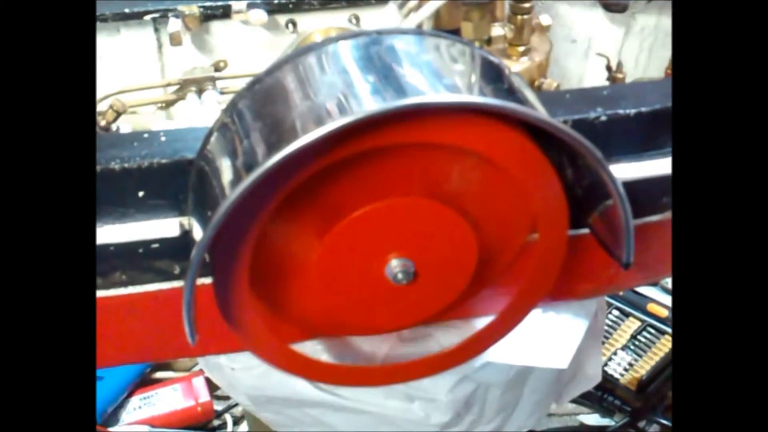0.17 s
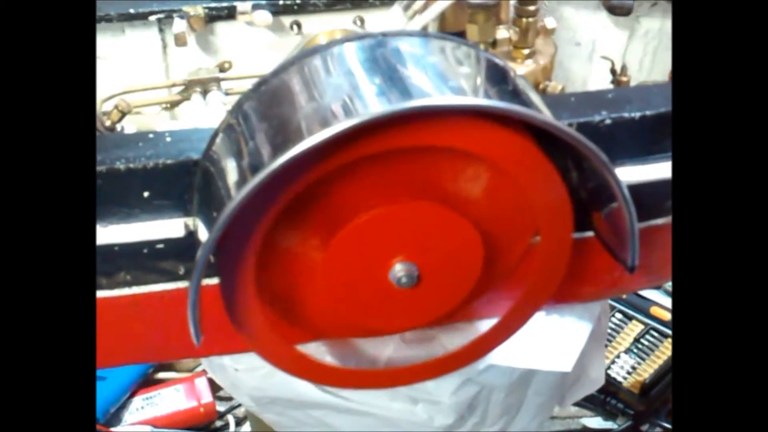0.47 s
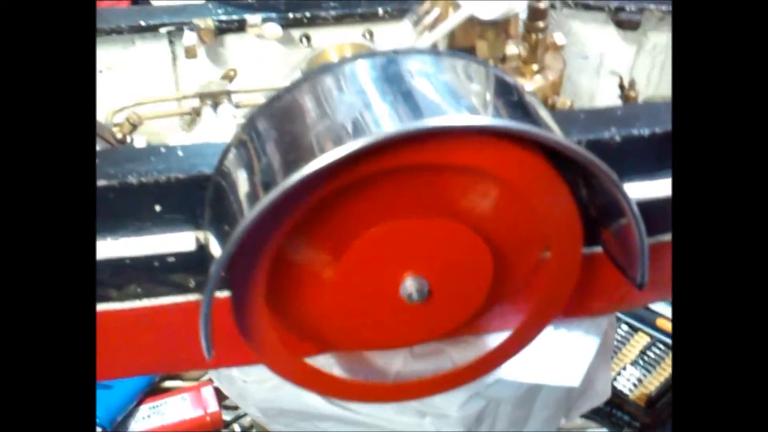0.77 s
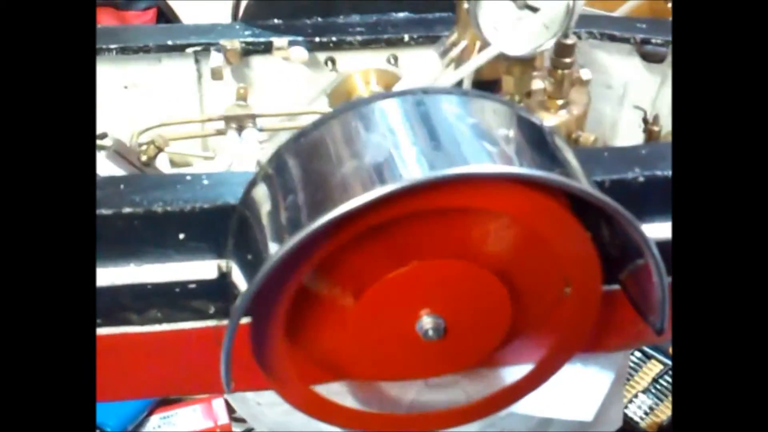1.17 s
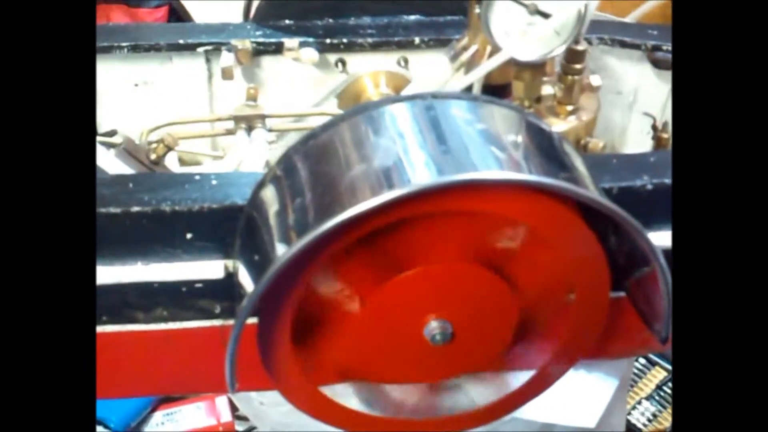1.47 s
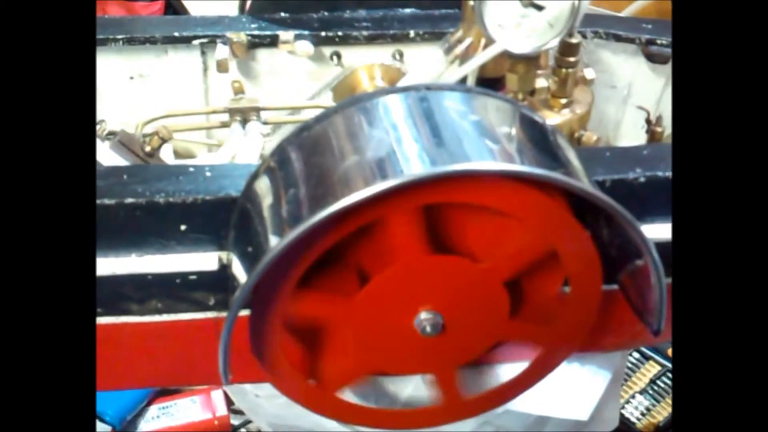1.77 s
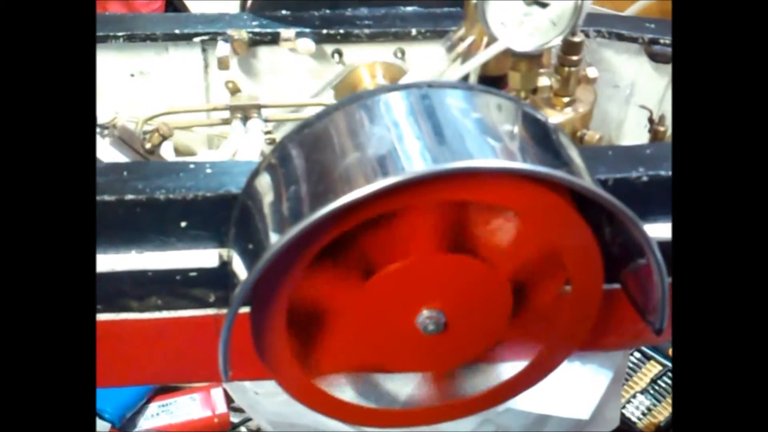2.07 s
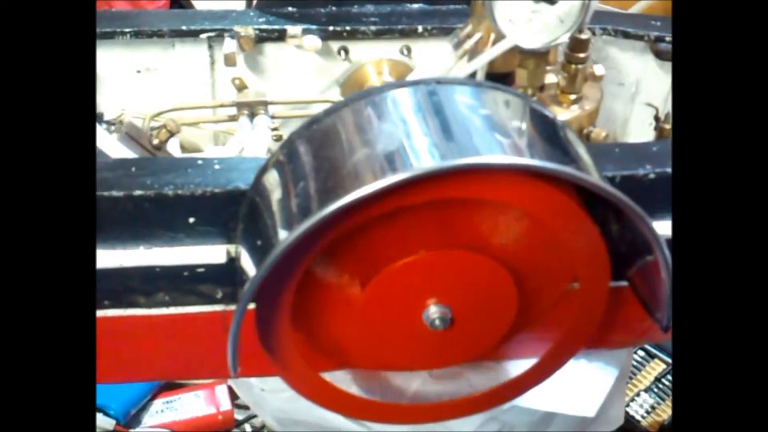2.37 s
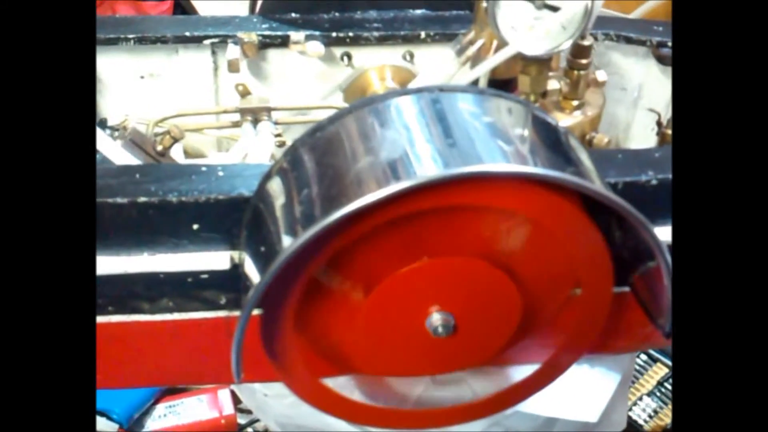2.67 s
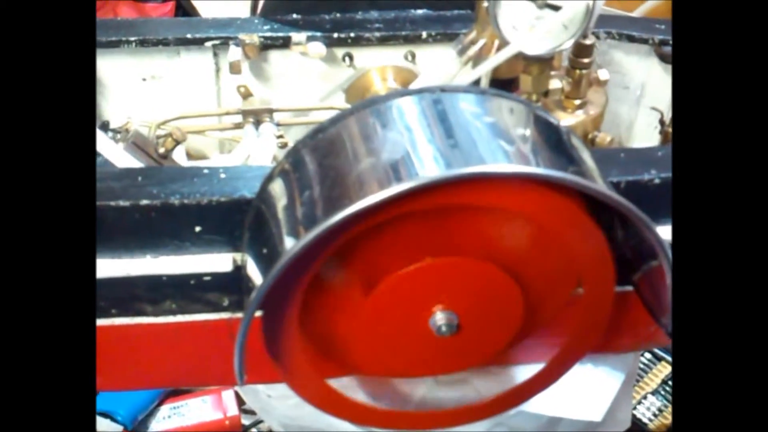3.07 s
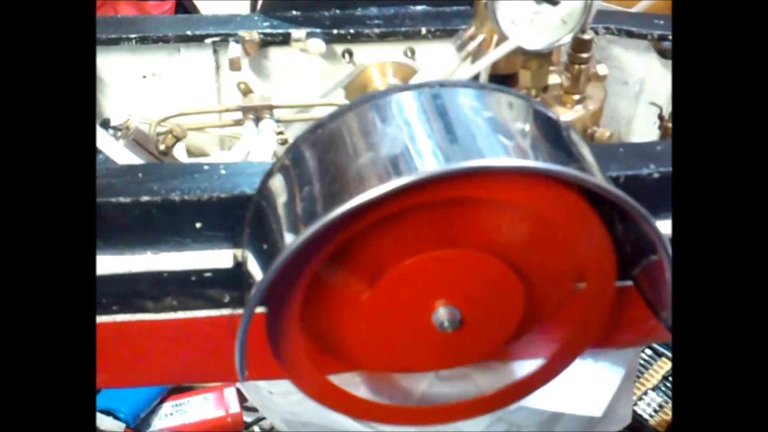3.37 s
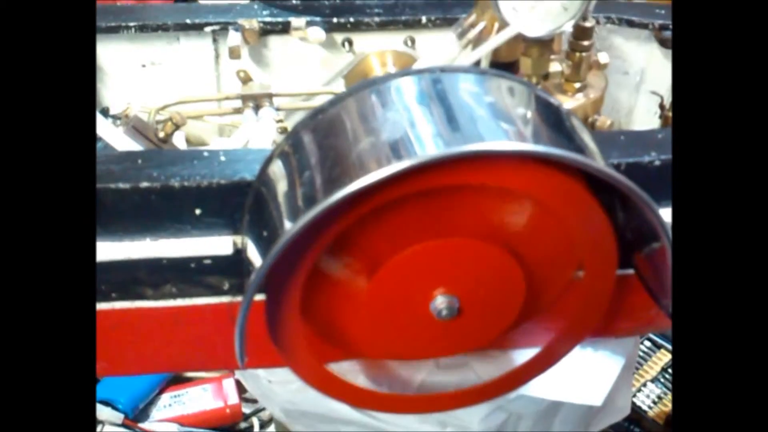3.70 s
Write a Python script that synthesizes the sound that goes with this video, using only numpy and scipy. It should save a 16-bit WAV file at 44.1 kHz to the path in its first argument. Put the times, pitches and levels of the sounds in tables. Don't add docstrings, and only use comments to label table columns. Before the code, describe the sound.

A model steam engine roars and hisses close up, its crank knocking fast, easing, then knocking harder

```python
import sys
import numpy as np
from scipy import signal
from scipy.fft import rfft, irfft, next_fast_len
from scipy.io import wavfile
from scipy.ndimage import uniform_filter1d, map_coordinates

SR = 44100
rng = np.random.default_rng(int(sys.argv[2]) if len(sys.argv) > 2 else 0)


def master_out(mix):
    frames = np.transpose(np.atleast_2d(mix))
    ceiling = np.clip(frames, -1, 1)
    pcm = np.round(ceiling * 32767).astype(np.int16)
    wavfile.write(sys.argv[1], SR, pcm)


def gain_from_db(level_db):
    decades = np.asarray(level_db, float) / 20
    return 10 ** decades


N = 169344

# (frequency [Hz], density [dB per Hz])
STEAM_COLOUR = [(600, 3), (1300, -2), (2300, -8.5), (3400, -11), (4300, 1), (5700, -0.5), (6900, 5),
                (7600, -4.5)]


def unit(x):
    return x / np.sqrt(np.mean(x ** 2) + 1e-20)


def along(points, hz):
    point_hz, db = np.transpose(points)
    return np.interp(np.log(hz + 1), np.log(point_hz + 1), db)


def curve(rows):
    s, value = np.transpose(rows)
    return np.interp(np.arange(N) / SR, s, value)


def wobble(rate_hz):
    knots = rng.standard_normal(int(N * rate_hz / SR) + 4)
    return map_coordinates(knots, [np.arange(N) * rate_hz / SR])


def filtered(x, response):
    m = next_fast_len(x.shape[-1] + SR // 8)
    spectrum = rfft(x, m) * response(np.fft.rfftfreq(m, 1 / SR))
    return irfft(spectrum, m)[..., :x.shape[-1]]


def resonant(x, modes, ratio=-1):
    def response(f):
        total = 0
        for k, (centre_hz, width_hz, db) in enumerate(modes):
            damping = 1j * f * width_hz
            total = total + ratio ** k * gain_from_db(db) * damping / (centre_hz ** 2 - f * f + damping)
        return total
    return filtered(x, response)


def patchy(depth_db):
    z = signal.stft(rng.standard_normal(N + 512), nperseg=256)[2]
    field = uniform_filter1d(rng.standard_normal(z.shape), size=4, axis=0)
    field = uniform_filter1d(field, size=8, axis=1)
    return signal.istft(z * gain_from_db(depth_db * unit(field)), nperseg=256)[1][:N]


def flue_roar():
    # (centre [Hz], width [Hz], level [dB])
    flue_modes = [(204.2, 31, -9), (300.3, 33.5, -5), (398.6, 50.7, 0), (482.7, 67, -0.5), (532.6, 40, -11)]
    # (time [s], centre of the roar [Hz])
    draught = [(0.0, 480), (0.05, 424), (0.28, 451), (0.64, 427), (0.73, 444), (0.89, 415), (1.08, 448),
               (1.33, 432), (1.5, 452), (1.54, 420), (1.61, 442), (2.61, 428), (2.65, 444), (2.75, 437),
               (3.21, 440), (3.42, 422), (3.51, 450), (3.84, 413)]
    middle_hz, lean_db_per_hz, ceiling_rms = 442, 0.23, 1.9
    roar = resonant(rng.standard_normal(N), flue_modes)
    roar = unit(resonant(roar, [(424.4, 347, 0)]))
    lean_db = lean_db_per_hz * (curve(draught) - middle_hz)
    upper = filtered(roar, lambda f: 1 / (1 + (middle_hz / (f + 1)) ** 16))
    roar = unit(gain_from_db(lean_db) * upper + gain_from_db(-lean_db) * (roar - upper))
    envelope = abs(signal.hilbert(roar))
    return roar / (1 + (envelope / ceiling_rms) ** 4) ** .25


def flares():
    # (time [s], peak [dB], pitch [Hz])
    flare_rows = [(0.066, -7, 441), (0.131, -4, 438), (0.174, -3.5, 467), (0.229, -3.5, 434),
                  (0.321, -5.5, 486), (0.38, -5, 480), (0.412, -5.5, 452), (0.487, -3.6, 443),
                  (0.573, -4.5, 447), (0.621, -3.5, 394), (0.662, -5.5, 434), (0.705, -2, 444),
                  (0.748, -5, 467), (0.771, -5.9, 426), (0.802, -2, 478), (0.91, -8.5, 437),
                  (0.925, -3.5, 432), (1.033, -4, 447), (1.282, -7, 420), (1.303, -3, 428),
                  (1.573, -2.5, 460), (1.611, -5.0, 458), (1.638, -5.3, 470), (1.696, -3.5, 460),
                  (1.798, -4.5, 459), (1.825, -8, 465), (1.9, -5.5, 442), (2.033, -4.5, 448),
                  (2.357, -8.5, 422), (2.381, -4.5, 438), (2.567, -4.5, 431), (2.585, -2.5, 432),
                  (2.673, -5, 409), (2.726, -5, 429), (2.792, -3, 394), (2.894, -7.5, 457),
                  (2.921, -4.5, 443), (3.037, -10, 422), (3.058, -3, 447), (3.121, -1, 438),
                  (3.226, -4, 476), (3.273, -3.5, 473), (3.397, -4.5, 460), (3.419, -2.5, 405),
                  (3.435, -10, 460), (3.472, -5, 462), (3.557, -3.5, 460), (3.697, -4.5, 443),
                  (3.807, -1, 438)]
    half_length_s, trim_db, split_hz = 0.0061, -0.5, 75
    s, db, hz = np.transpose(flare_rows)[:, :, None]
    t = np.arange(-SR // 50, SR // 50) / SR
    at = np.round((s + t) * SR).astype(int).ravel()
    bell = np.exp(-.5 * (t / half_length_s) ** 2) + 0 * s
    beat = np.cos(np.pi * split_hz * t)
    tones = gain_from_db(db + trim_db) * bell * beat * np.cos(2 * np.pi * (hz * t + rng.random(s.shape)))
    share = np.clip(np.bincount(at, bell.ravel(), N)[:N], 0, 1)
    return np.bincount(at, tones.ravel(), N)[:N], share


def burner():
    # (time [s], level [dB])
    roar_level = [
        (0, -12.5),
        (.8, -12.5),
        (1.2, -12),
        (2.1, -13),
        (2.7, -13.5),
        (3.1, -11.5),
        (3.84, -15),
    ]
    # (frequency [Hz], density [dB per Hz])
    flame_colour = [(110, -44), (130, -37), (200, -17), (400, -3.5), (560, 7), (680, -15), (900, -44.5),
                    (1500, -82)]
    rush_db = -13.5
    roar = flue_roar()
    rush = unit(filtered(rng.standard_normal(N), lambda f: gain_from_db(along(flame_colour, f))))
    tones, share = flares()
    return gain_from_db(curve(roar_level)) * ((1 - share) * roar + gain_from_db(rush_db) * rush) + tones


def casing(effort_db):
    # (centre [Hz], width [Hz], level [dB])
    casing_modes = [(767.3, 49, -5.5), (859, 18, -4.5), (935, 36, -1), (1023.6, 36, -4), (1084.7, 49.6, -1),
                    (1267, 54, -9.5), (1488, 183, -8), (1846, 26, -6), (1977, 85, -9.5), (2127, 32, -5.5),
                    (2274, 59, -1.5), (2461, 36, -1), (2595, 140, -5), (2822, 24, -12),
                    (2876, 36, -12), (2957, 42, -9), (3025, 29, -12), (3724, 30, -7.5), (3787, 13, -5.5),
                  (4000, 50, -6), (4170, 44, -10.5)]
    level_db, follow = -20.5, 0.13
    panel_top_hz, panel_follow = 2150, .25
    change_db = effort_db - effort_db.mean()
    hum = unit(resonant(patchy(depth_db=1.5), casing_modes))
    low = filtered(hum, lambda f: 1 / (1 + (f / panel_top_hz) ** 12))
    hum = hum + (gain_from_db(panel_follow * change_db) - 1) * low
    return gain_from_db(level_db + follow * change_db + 0.58 * wobble(8.885)) * hum


def valve_ticks():
    ticks_per_s, decay_cycles, scatter_db = 380, 3, 9
    centre_hz, log_spread = 4390, 1.394
    place, pitch, strength = rng.random((3, int(ticks_per_s * N / SR), 1))
    t = np.arange(400) / SR
    hz = np.clip(centre_hz * np.exp(log_spread * (pitch - .5)), 300, 9000)
    grains = gain_from_db(scatter_db * strength ** 2) * np.sin(2 * np.pi * hz * t) * np.exp(-t * hz / decay_cycles)
    at = (place * N).astype(int) + np.arange(400)
    return unit(np.bincount(at.ravel(), grains.ravel(), N + 400)[:N])


def steam(effort_db):
    level_db, tick_db = 1.5, -9
    hiss = unit(filtered(rng.standard_normal(N), lambda f: gain_from_db(along(STEAM_COLOUR, f))))
    hiss = hiss * gain_from_db(0.23 * wobble(11))
    return gain_from_db(effort_db + level_db) * (hiss + gain_from_db(tick_db) * valve_ticks())


def head_unit(x):
    return x / np.sqrt(np.mean(x[:, :SR // 100] ** 2, axis=1, keepdims=True))


def crank():
    # (time [s], level [dB], ring [dB], puff [dB])
    strokes = [(0.0248, -9.5, -8, 2), (0.1305, -6.5, -23.5, -23.5), (0.2233, -13, 4.5, 3),
               (0.2847, -14.5, 0.5, 3), (0.3027, -6.5, -5.5, -0.5), (0.3638, -8.5, -4.5, 1),
               (0.4207, -8, -12, -3), (0.5028, -22.5, 6, -10.5), (0.519, -9.5, 1.5, -1.5),
               (0.5816, -12, 3.5, 7), (0.631, -12, -15.5, 8), (0.6862, -9, -13.5, 3),
               (0.7682, -25.5, -4.5, 5.5), (0.858, -15.5, 6.5, 1), (0.908, -9.5, 8.5, 4.5),
               (0.9611, -6, -1, -7), (1.0734, -7, -3, -2), (1.133, -1, -7, -5), (1.1936, -9, 0.5, 4),
               (1.2081, -5.5, 0, -10), (1.2765, -6, -8, -0.5), (1.2994, -10.5, 2, -19),
               (2.0986, -15.5, 4.5, -3), (2.206, -8.5, -5.5, -0.5), (2.2613, -15.5, -3.5, 8),
                    (2.3338, -12, -22, -10.5), (2.384, -8.5, -2, 3), (2.4991, -8.5, 3, 1.5),
                    (2.598, -1.5, -3.5, -3.5), (2.6829, -0.5, -5.5, -8), (2.7663, -2.5, -8.5, -2.5),
                    (2.8399, -7, -4.5, -1), (2.8545, -8.5, -6, 1), (2.9141, -5, 0.5, -1),
                    (2.984, 1, -13.5, -8), (3.053, -1, -7.5, -6.5), (3.1193, -3.5, -3.5, -7),
                    (3.188, -3.5, -1.5, -31), (3.2527, -6, -6, -4.5), (3.3213, -3, -3, -4.5),
                    (3.3874, -5, 0.5, -2), (3.453, -1.5, -13, -10), (3.5164, -1.5, -10.5, -8),
                    (3.583, -0.5, -6.5, -10), (3.6486, -5.5, 1.5, -1.5), (3.711, 1.5, -25.5, -6.5),
                    (3.778, -4.5, 0, -4)]
    # (centre [Hz], width [Hz], level [dB])
    crank_modes = [(1600, 57, -2.5), (1575, 72, -0.5), (1644, 180, -1), (1875, 110, -2.5),
                   (2040, 310, -5.5)]
    # (centre [Hz], width [Hz], level [dB])
    frame_modes = [(2286, 340, 1), (2466, 68, -3), (2890, 180, -4)]
    knock_db, ring_trim_db, puff_trim_db, stroke_trim_db = -8.5, -5.5, -6.5, -7
    blow_db = 19.5
    chatter_t60_s, puff_t60_s, puff_rise_s = .052, .055, .003
    rebound_s, rebound_db = .012, -6

    s, db, ring_db, puff_db = np.transpose(strokes)
    t = np.arange(SR // 8) / SR
    late_s = rebound_s * rng.uniform(.75, 1.35, (len(s), 1))

    def burst(t60_s):
        first = gain_from_db(-60 * t / t60_s)
        rebound = (t > late_s) * gain_from_db(rebound_db - 60 * (t - late_s) / t60_s)
        return rng.standard_normal((len(s), len(t))) * (first + rebound)

    crank_push, frame_push = burst(chatter_t60_s), burst(chatter_t60_s)
    crank_push[:, 0] = gain_from_db(blow_db)
    frame_push[:, 0] = gain_from_db(blow_db)
    knock = resonant(resonant(crank_push, crank_modes, ratio=0.88), [(1820, 1200, 0)])
    ring = resonant(frame_push, frame_modes, ratio=1)
    jet = burst(puff_t60_s) * (1 - np.exp(-t / puff_rise_s))
    puff = filtered(jet, lambda f: gain_from_db(along(STEAM_COLOUR, f)) * f / (f + 2500))

    hits = gain_from_db(knock_db) * head_unit(knock)
    hits = hits + gain_from_db(ring_db + ring_trim_db)[:, None] * head_unit(ring)
    hits = hits + gain_from_db(puff_db + puff_trim_db)[:, None] * head_unit(puff)
    out = np.zeros(N + SR)
    for at_s, level_db, hit in zip(s, db, hits):
        out[round(at_s * SR):][:len(t)] += gain_from_db(level_db + stroke_trim_db) * hit
    return out[:N]


def room(x):
    t60_s = 0.13
    t = np.arange(SR // 3) / SR
    tail = rng.standard_normal(len(t)) * gain_from_db(-60 * t / t60_s)
    return signal.fftconvolve(np.pad(x, (120, 0)), tail / np.linalg.norm(tail))[:N]


def scene():
    # (time [s], steam level [dB])
    effort = [(0, -24.5), (.3, -23), (.65, -21), (.88, -18), (.93, -21.5), (1.0, -20.5), (1.1, -25),
              (1.22, -24), (1.33, -26), (1.5, -28), (1.8, -26), (2.1, -25.5), (2.35, -25.5), (2.6, -23.5),
              (3.0, -21.5), (3.4, -21.5), (3.84, -20.5)]
    steam_room_db, knock_room_db = -7, -23.5
    effort_db = curve(effort)
    knocks, hiss = crank(), steam(effort_db)
    mix = burner() + casing(effort_db) + hiss + knocks
    mix = mix + gain_from_db(steam_room_db) * room(hiss) + gain_from_db(knock_room_db) * room(knocks)
    return np.array([mix, mix])


def mute_weak_bands(x):
    # (frequency [Hz], level [dB])
    threshold = [(105, -28), (145, -55), (1500, -53.5), (3300, -53), (4600, -56), (5900, -53), (6500, -56),
                 (7800, -63)]
    hz, _, z = signal.stft(x, SR, nperseg=2048)
    power = uniform_filter1d(abs(z) ** 2, size=3, axis=0)
    power = uniform_filter1d(power, size=7, axis=1)
    is_open = power > gain_from_db(along(threshold, hz))[:, None] ** 2
    return signal.istft(z * is_open, SR, nperseg=2048)[1][:N]


def top_cut(x):
    return signal.sosfilt(signal.butter(12, 8340, fs=SR, output="sos"), x)


def record(dry):
    low_hz, top_hz, overload = 128, 7720, 1.42
    x = filtered(dry[0], lambda f: 1 / (1 + (low_hz / (f + 1)) ** 24) / (1 + (f / top_hz) ** 60))
    x = x / (1 + abs(x / overload) ** 4) ** .25
    x = filtered(mute_weak_bands(x), lambda f: (f > 118) & (f < 7900))
    x = np.clip(x, -1, 1)
    return top_cut(np.array([x, x]))


dry = scene()
out = record(dry)
master_out(out)
```